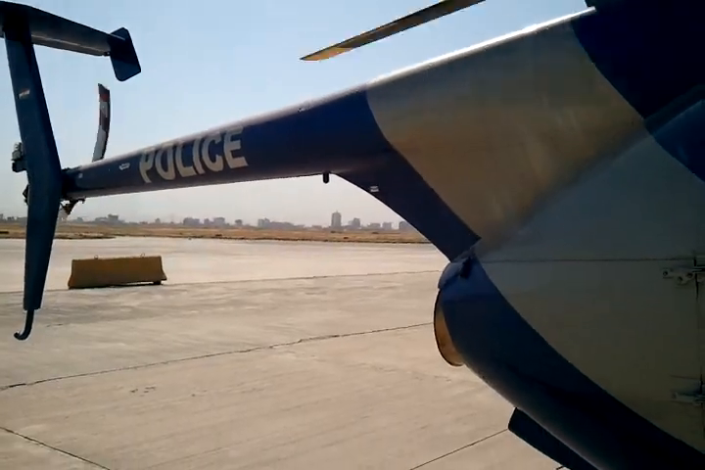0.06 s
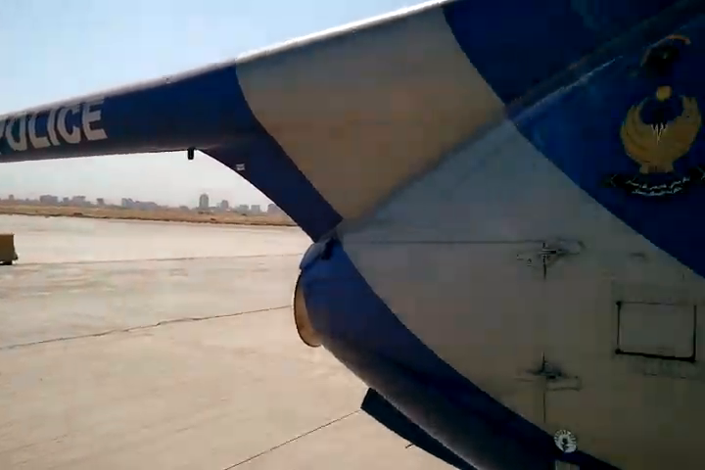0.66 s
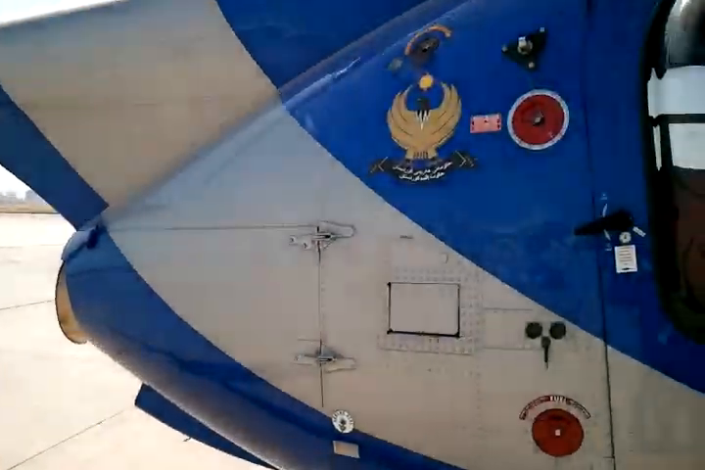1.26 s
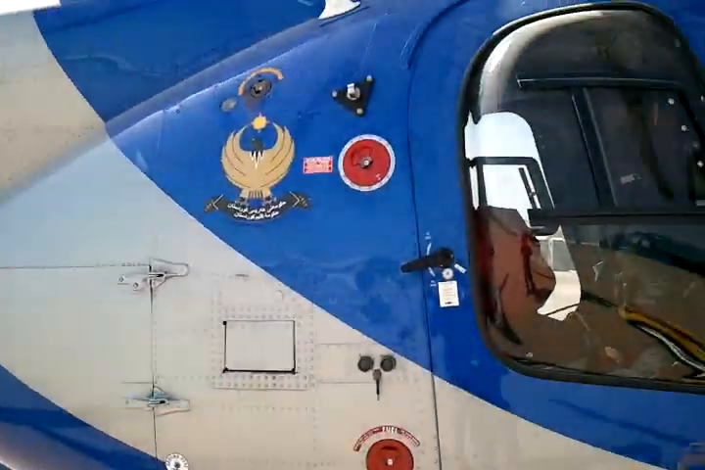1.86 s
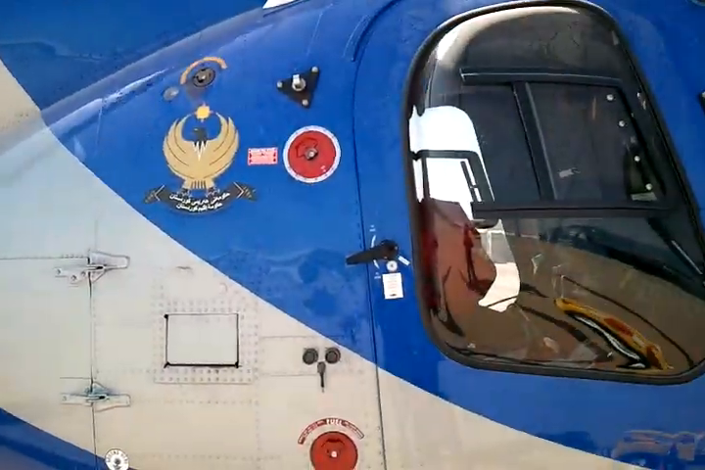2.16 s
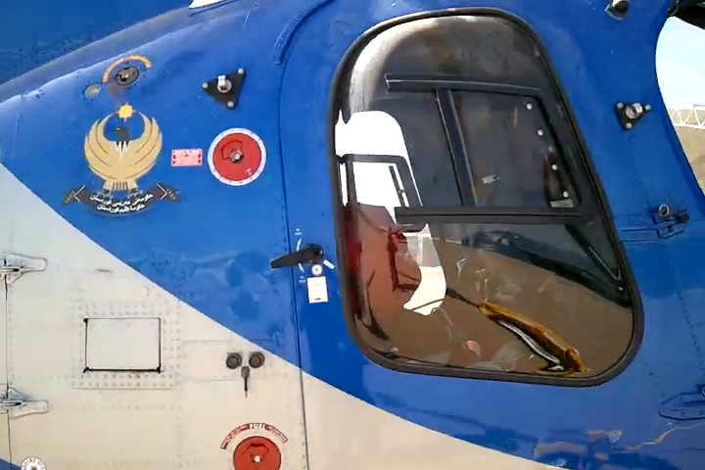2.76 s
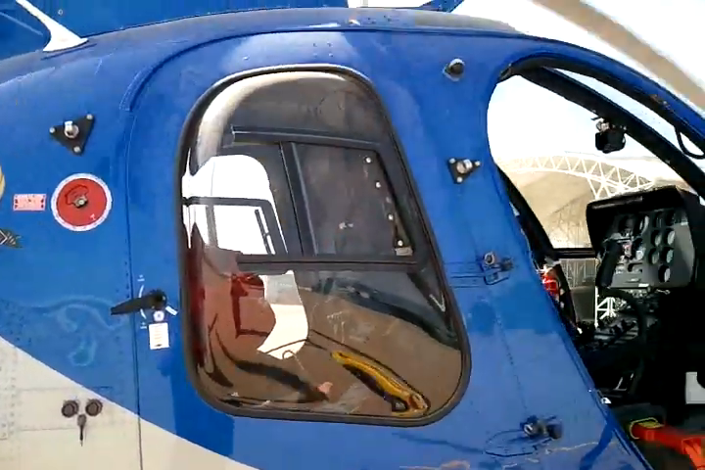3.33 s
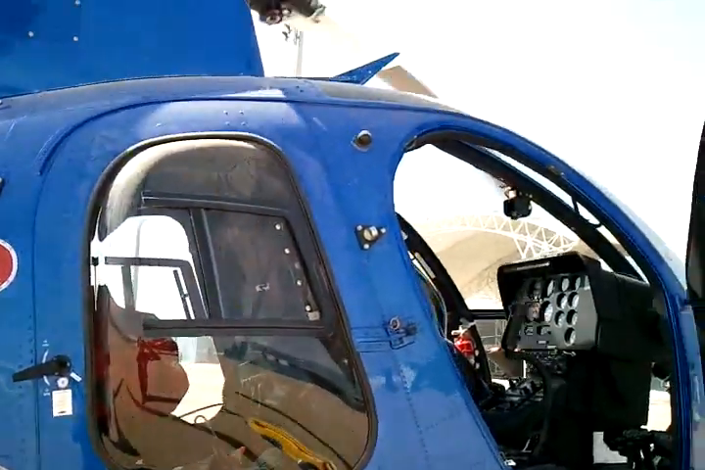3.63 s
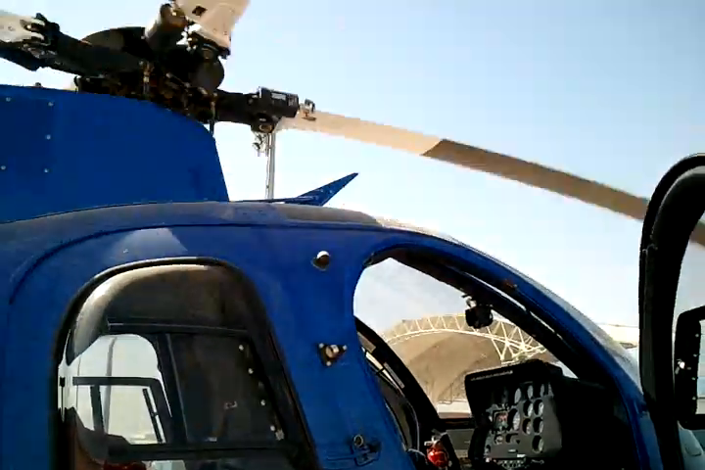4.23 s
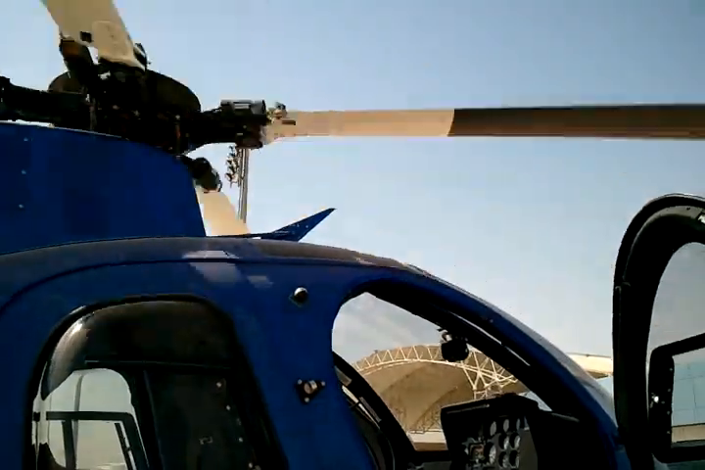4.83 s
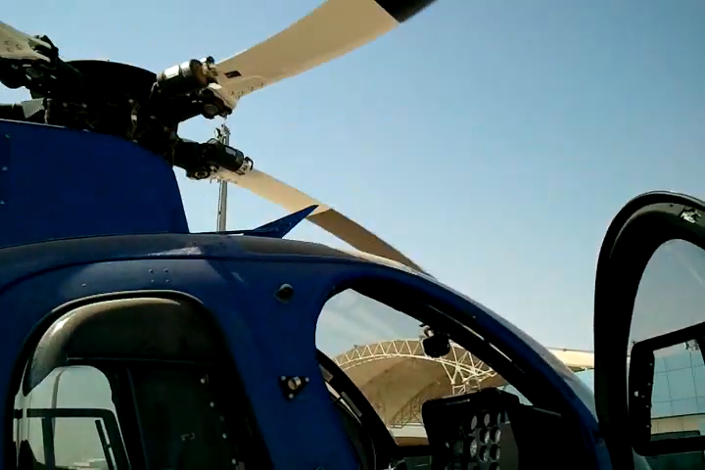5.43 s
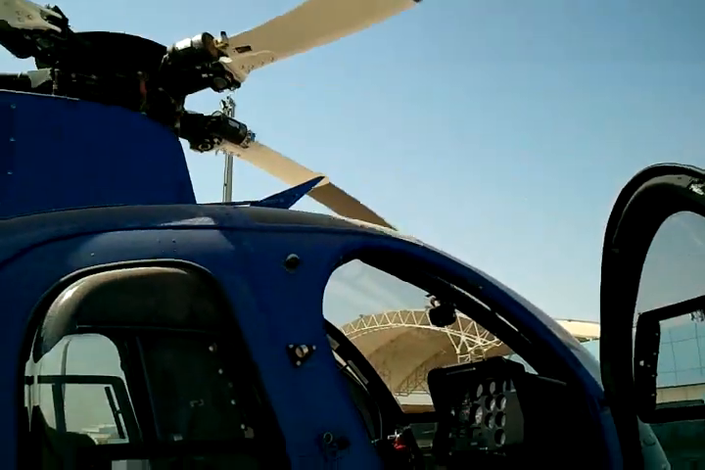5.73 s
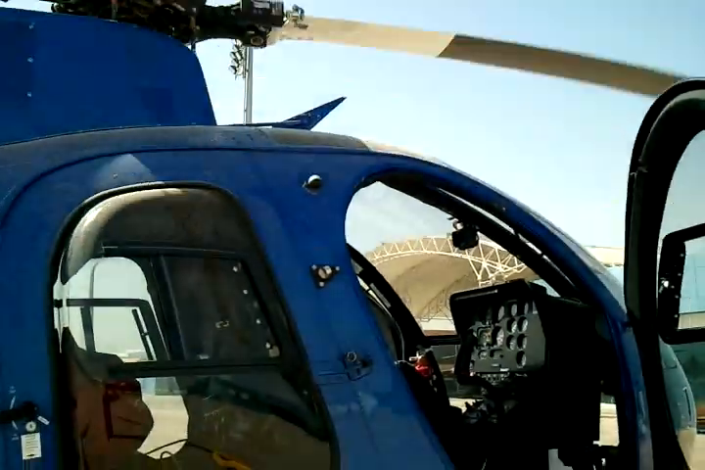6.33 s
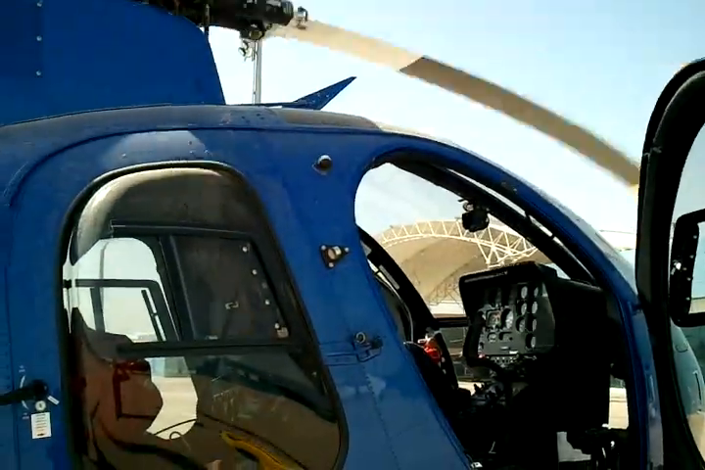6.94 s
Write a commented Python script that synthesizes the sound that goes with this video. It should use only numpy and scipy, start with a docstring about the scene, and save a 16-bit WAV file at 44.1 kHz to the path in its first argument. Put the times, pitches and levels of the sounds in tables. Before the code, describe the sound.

Close, overloaded roar of a helicopter engine winding up, its shrill hiss pulsing faster as the rotor gathers speed.

```python
"""Turbine helicopter spooling up

A light helicopter on an open apron, heard close along its fuselage. Combustion roar howls in the
exhaust duct, the compressor's hiss throbs with each passing blade, and gears whine higher as the rotor
gathers speed. The din overloads the microphone, so roar and hiss crowd each other out."""
import sys
import numpy as np
from scipy import signal
from scipy.fft import rfft, irfft
from scipy.io import wavfile

SR = 44100
rng = np.random.default_rng(int(sys.argv[2]) if len(sys.argv) > 2 else 0)


def digitize_waveform(pressure):
    """Quantize a signal to 16-bit integers and store it at the path in sys.argv[1].

    Rows of a 2-D input are taken as channels; values are limited to [-1, 1].
    """
    field = np.atleast_2d(pressure).T
    bounded = np.clip(field, -1, 1)
    quanta = np.round(bounded * 32767).astype(np.int16)
    wavfile.write(sys.argv[1], SR, quanta)


N = 317079

# The rotor gathers speed. Each row: time in seconds, blade passes per second.
ROTOR_SPEED = [(0, 11.46), (1, 12.93), (2, 14.61), (3, 16.13), (4, 17.38), (5, 18.58), (6, 20.53),
               (7.19, 22.63)]
# The engine shaft winds up. Each row: time in seconds, turns per second.
SHAFT_SPEED = [(0, 385), (.5, 398), (1, 409), (1.5, 418), (2, 424), (2.7, 427.5), (4, 427), (4.5, 432),
               (5, 445), (5.5, 460), (6, 470), (6.5, 476.5), (7.19, 477.5)]
# Fader for the shaft's hum. Each row: time in seconds, level in dB.
HUM_LEVEL = [(0, -18), (.5, -24), (1, -25), (2, -27.5), (3.1, -30.5), (3.6, -21), (4.2, -17), (4.7, -24),
             (5.4, -27.5), (6, -36.5), (7.19, -30.5)]
# Fader for the engine gear's whine. Each row: time in seconds, level in dB.
ENGINE_GEAR_LEVEL = [(0, -49), (2.7, -42.5), (4, -46), (5.2, -45.5), (5.9, -39), (6.5, -30.5), (7.19, -27)]
# Fader for the gearbox whine. Each row: time in seconds, level in dB.
GEARBOX_LEVEL = [(0, -37.5), (1.4, -33), (2.1, -35), (2.7, -33), (3.7, -35.5), (4.6, -41), (5.9, -32.5),
                 (7.19, -34)]
# The gearbox chord. Each row: cycles per blade pass, level in dB against the gearbox fader.
GEARBOX_TONES = [(177, 0), (32, -5), (513, -9)]

# Faders for flame and air flow. Each row: time in seconds, howl level in dB, hiss level in dB.
FLOW_LEVELS = [(0, -20.1, -22.5), (.4, -21.6, -19.5), (.8, -23.1, -20), (1.2, -19.6, -20),
               (2, -19.4, -21.3), (2.8, -18.6, -21.3), (3.5, -16.6, -19.7), (4.1, -17.2, -18.5),
               (5, -18.6, -17.3), (5.8, -16.6, -19), (6.5, -16.4, -22), (7.19, -15.6, -21.5)]
# Colour of the compressor's hiss. Each row: time in seconds, centre in Hz, throb depth in dB,
# skirt and whistle levels in dB against the core.
HISS_COLOUR = [(0, 4220, 5, -1, -18), (1, 4229, 2.8, -4, -10), (2, 4015, 3.5, -2, -2),
               (3.4, 3992, 4, -5, -3), (4.2, 4043, 3.6, -9, -9), (4.7, 4250, 2.8, -9.5, -6),
               (5.3, 4275, 4, -10, -6), (5.8, 4143, 2.5, -8, -7), (7.19, 4134, 2, -1.5, -7)]
# Whistles inside the hiss. Each row: multiple of the hiss centre, width in Hz, relative level in dB.
WHISTLE_BANDS = [(1.003, 28.6, -5), (1.03, 59, -4.5), (.98, 49, -9.5), (.935, 31, -4.5), (.85, 31, -7.5)]
# The loudest squeals of the hiss. Each row: time of the peak in seconds, peak level in dB, pitch in Hz.
LOUD_SQUEALS = [(1.9215, -13, 3870), (2.135, -10.5, 4010), (2.4029, -13, 4006), (2.788, -12.5, 4020),
                (3.1565, -12.5, 4150), (3.2293, -13, 4050), (3.4509, -10.5, 4040), (3.5795, -12, 4100),
                (4.2093, -7.5, 4050), (4.3186, -11.5, 4140), (4.5495, -11.5, 4000), (5.2017, -10.5, 3980),
                (5.3097, -10.5, 4330), (5.458, -12.5, 4360)]

# Tone of the broad jet noise. Each row: frequency in Hz, relative spectral density in dB.
JET_SPECTRUM = [(30, -7), (70, -4), (170, 2), (270, 8), (400, 3), (490, -9), (750, -1), (1050, -3.5),
                (1330, -1.5), (1600, -2.5), (2000, -2), (2800, -10.5), (3500, -8), (6300, -22.5),
                (8000, -37.5)]
# Fader for the jet noise. Each row: time in seconds, level in dB.
JET_FADER = [(0, -18), (1.5, -20.5), (3.8, -19.5), (5.5, -19), (7.19, -17.5)]
# Fader for the duct's lowest mode. Each row: time in seconds, level in dB.
RUMBLE_FADER = [(0, -24), (2, -21.5), (2.5, -23), (3.1, -19.8), (4.3, -22.5), (5.3, -26.5), (7.19, -25)]
# Flame surges, each a short boom. Each row: time of the peak in seconds, peak level in dB.
FLAME_SURGES = [(.2, -17), (.68, -16.5), (1.18, -18.5), (1.54, -17.5), (1.66, -16), (1.76, -15.5),
                (2.82, -21), (4.31, -15.5), (4.39, -18), (4.81, -20), (5.69, -22), (5.87, -22), (6.01, -19),
                (6.91, -19)]
# The duct's tuning shifts with the gas temperature.
# Each row: time in seconds, howl pitch in Hz, howl width in Hz, overtone pitch in Hz.
DUCT_TUNING = [(0, 355, 115, 595), (.7, 365.1, 115, 610), (1.3, 351.1, 75.02, 590), (2, 330, 55, 560),
               (2.7, 341.1, 48, 550), (3.4, 338, 48, 560), (4.2, 348.9, 75, 575), (4.8, 373.9, 65, 590),
               (5.3, 359.8, 90, 580), (6, 364.3, 64.97, 580), (7.19, 353.2, 65, 570)]
# Fader for the howl's overtone. Each row: time in seconds, level in dB.
OVERTONE_FADER = [(0, -21.5), (1.2, -21.8), (1.7, -24.5), (3.7, -27), (4.6, -25), (7.19, -25.5)]


def from_db(db):
    """Decibels to gain."""
    return 10 ** (np.asarray(db) / 20)


def unit_rms(x):
    """Scale to unit power."""
    return x / np.sqrt(np.mean(x ** 2) + 1e-20)


def automation(rows):
    """One curve for each column after the time, a value per sample."""
    times, *columns = np.transpose(rows)
    return [np.interp(np.arange(N) / SR, times, column) for column in columns]


def phase_of(hz):
    """Phase in radians of something turning at a changing rate."""
    return 2 * np.pi * np.cumsum(hz) / SR


def swell(age_s, sigma_s):
    """A bell-shaped rise and fall, height 1 at age 0."""
    return np.exp(-.5 * (age_s / sigma_s) ** 2)


def drift(rate_hz):
    """Smooth random motion up to about the given rate, with a spread of 1."""
    step = 8   # samples per point of a coarse grid
    smoothing = signal.butter(2, rate_hz, fs=SR / step, output="sos")
    slow = signal.sosfilt(smoothing, rng.standard_normal((N + SR) // step + 2))[SR // step:]
    return np.interp(np.arange(N) / step, np.arange(len(slow)), unit_rms(slow))


def resonance(centre_hz, width_hz, steadiness=0):
    """Turbulence rings a moving resonance; a self-sustained one (steadiness near 1) holds its level."""
    widest = np.max(width_hz)
    swing = drift(widest / 2) + 1j * drift(widest / 2)
    clock = np.cumsum(np.ones(N) * width_hz / widest)   # a narrower resonance wavers more slowly
    swing = np.interp(clock, np.arange(N), swing)
    swing = swing / (np.abs(swing) + 0.068) ** steadiness
    carrier = np.exp(1j * phase_of(centre_hz + np.zeros(N)))
    return unit_rms(np.real(swing * carrier))


def low_pass(x, edge_hz, steepness):
    """Roll off the top without phase shift."""
    hz = np.arange(N // 2 + 1) * SR / N
    return irfft(rfft(x) / np.sqrt(1 + (hz / edge_hz) ** steepness), N)


def drive_train(blade_phase):
    """Shaft hum and gear whine climb with engine and rotor speed; the moving air makes them flutter."""
    engine_gear_ratio = 7.685
    swell_depth_db, passes_per_swell, first_crest_passes = 3, 5.76, .9
    shaft_phase = phase_of(automation(SHAFT_SPEED)[0])
    hum_db = automation(HUM_LEVEL)[0] + drift(14)
    hum = from_db(hum_db) * np.sin(shaft_phase + 0.066 * drift(7.9))
    swell_phase = (blade_phase - 2 * np.pi * first_crest_passes) / passes_per_swell
    gearbox_db = automation(GEARBOX_LEVEL)[0] + swell_depth_db * np.cos(swell_phase)
    gears = [(engine_gear_ratio * shaft_phase, automation(ENGINE_GEAR_LEVEL)[0])]
    gears += [(ratio * blade_phase, gearbox_db + db) for ratio, db in GEARBOX_TONES]
    whine = sum(from_db(db + 2 * drift(8)) * np.sin(phase + 0.14 * drift(10)) for phase, db in gears)
    return np.sqrt(2) * (hum + whine)


def blade_pips(blade_phase):
    """Cue a faint pip on each blade's crest. Each row: time in seconds, peak in dB, pitch in Hz."""
    lift_db, scatter_db, pitch_ratio, scatter_hz = 5.5, 2.5, 0.99, 101
    crests = np.flatnonzero(np.diff(blade_phase // (2 * np.pi)))
    _, hiss_db = automation(FLOW_LEVELS)
    centre_hz, _, _, whistle_db = automation(HISS_COLOUR)
    level_chance, pitch_chance = rng.standard_normal((len(crests), 2)).T
    peak_db = (hiss_db + whistle_db)[crests] + lift_db + scatter_db * level_chance
    pitch_hz = pitch_ratio * centre_hz[crests] + scatter_hz * pitch_chance
    return list(zip(crests / SR, peak_db, pitch_hz))


def compressor_squeals(blade_phase):
    """Loud squeals and faint pips ride on the hiss, each a flash of one slightly wavering pitch."""
    sigma_s = 0.0071
    t, out = np.arange(N) / SR, np.zeros(N)
    wobble = .5 * drift(90)
    for peak_s, db, hz in LOUD_SQUEALS + blade_pips(blade_phase):
        near = slice(int((peak_s - 4 * sigma_s) * SR), int((peak_s + 4 * sigma_s) * SR))
        age = t[near] - peak_s
        out[near] += from_db(db) * swell(age, sigma_s) * np.sin(2 * np.pi * hz * age + wobble[near])
    return out


def compressor_hiss(blade_phase):
    """A bright core of hiss, flickering whistles and a wide skirt throb once for each passing blade."""
    skirt_throb_share = .75
    _, hiss_db = automation(FLOW_LEVELS)
    centre_hz, depth_db, skirt_db, whistle_db = automation(HISS_COLOUR)
    core = resonance(centre_hz, width_hz=910)
    skirt = resonance(centre_hz * 1.14, width_hz=2630)
    whistles = sum(from_db(db + 2 * drift(13)) * resonance(multiple * centre_hz, width, steadiness=.5)
                   for multiple, width, db in WHISTLE_BANDS)
    throb_db = depth_db * np.cos(blade_phase + 0.12) + 0.37 * drift(23)
    hiss = from_db(throb_db) * (core + from_db(whistle_db) * unit_rms(whistles))
    hiss += from_db(skirt_db + skirt_throb_share * throb_db) * skirt
    summed_power = 1 + from_db(skirt_db) ** 2 + from_db(whistle_db) ** 2
    return from_db(hiss_db) * hiss / np.sqrt(summed_power)


def jet_noise():
    """The jet's broad rush: third-octave bands of noise, each flickering by about 1 dB on its own."""
    edges_hz = 25 * 2 ** (np.arange(27) / 3)
    points_hz, points_db = np.transpose(JET_SPECTRUM)
    white, rush = rng.standard_normal((2, N)), 0
    for k, (low, high) in enumerate(zip(edges_hz, edges_hz[1:])):
        band_pass = signal.butter(2, [low, high], "band", fs=SR, output="sos")
        band_db = np.interp(np.log(low * high) / 2, np.log(points_hz), points_db)
        rush = rush + signal.sosfilt(band_pass, white[k % 2]) * from_db(band_db + drift(10))
    return from_db(automation(JET_FADER)[0]) * unit_rms(rush)


def duct_rumble():
    """The duct's lowest mode rumbles in uneven lumps and booms when the flame surges."""
    t = np.arange(N) / SR
    lumps = from_db(automation(RUMBLE_FADER)[0] + 1.5 * drift(12))
    booms = sum(from_db(db) * swell(t - peak_s, sigma_s=0.018) for peak_s, db in FLAME_SURGES)
    return np.hypot(lumps, booms) * resonance(centre_hz=106.6, width_hz=22.2, steadiness=0.4)


def exhaust(blade_phase):
    """The flame drives three modes of the duct (rumble, howl, overtone) over the rush of the jet."""
    howl_db, _ = automation(FLOW_LEVELS)
    howl_hz, howl_width_hz, overtone_hz = automation(DUCT_TUNING)
    flutter_db = 1.5 * drift(26)   # the flame burns unevenly
    sag_hz = 22 * np.maximum(drift(9), 0) ** 2   # now and then the pitch droops
    howl = from_db(howl_db + flutter_db) * resonance(howl_hz - sag_hz, howl_width_hz, steadiness=0.17)
    overtone = from_db(automation(OVERTONE_FADER)[0]) * resonance(overtone_hz, width_hz=110)
    chuff_db = -1.5 * np.cos(blade_phase)   # the roar peaks between two throbs of the hiss
    return from_db(chuff_db) * (howl + overtone + jet_noise()) + duct_rumble()


def scene():
    """A close, dry mono mix in the open air, with the rotor setting the pulse."""
    blade_phase = phase_of(automation(ROTOR_SPEED)[0])
    compressor = compressor_hiss(blade_phase) + compressor_squeals(blade_phase)
    return (exhaust(blade_phase) + compressor + drive_train(blade_phase))[None]


def record(dry):
    """The overloaded microphone input squares the wave off; two steep cuts dull the top."""
    drive_db, ceiling = 12.5, .35
    crushed = ceiling * np.tanh(from_db(drive_db) * dry / ceiling)
    dull = low_pass(crushed, edge_hz=6786, steepness=31.9)
    return low_pass(dull, edge_hz=8900, steepness=200)


dry = scene()
out = record(dry)
digitize_waveform(out)
```